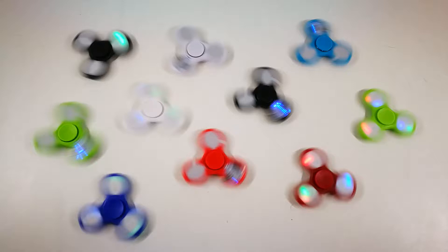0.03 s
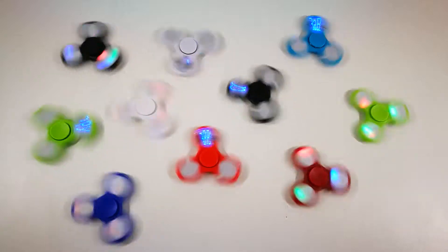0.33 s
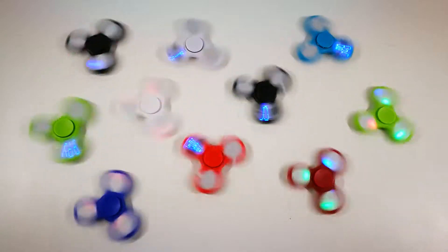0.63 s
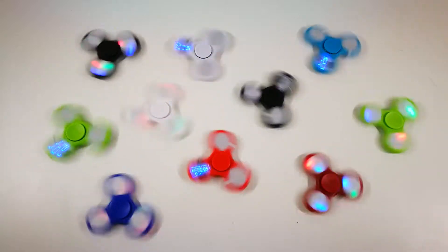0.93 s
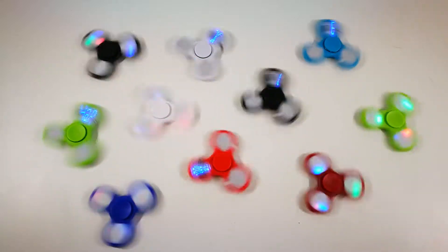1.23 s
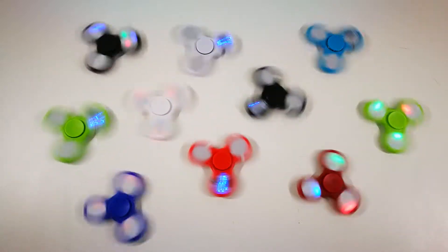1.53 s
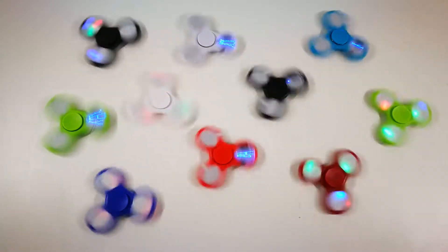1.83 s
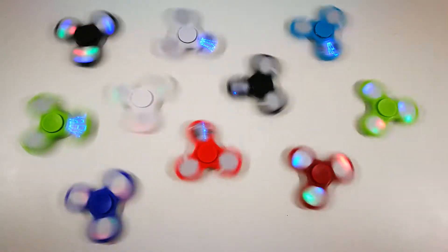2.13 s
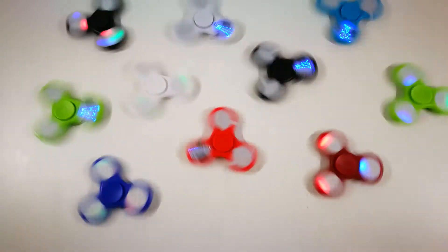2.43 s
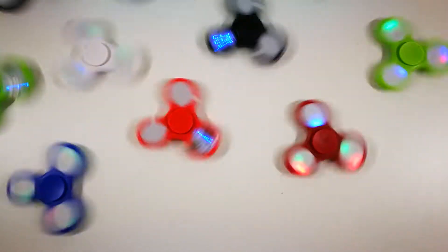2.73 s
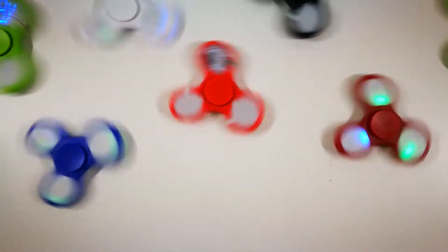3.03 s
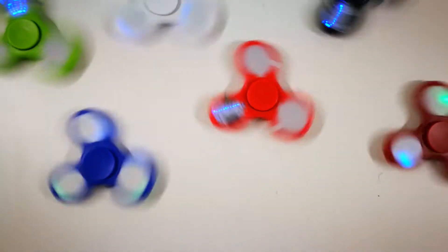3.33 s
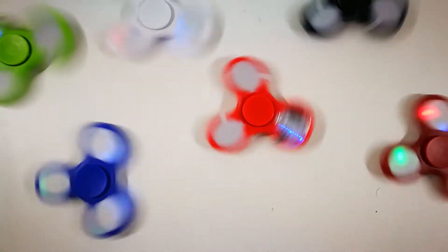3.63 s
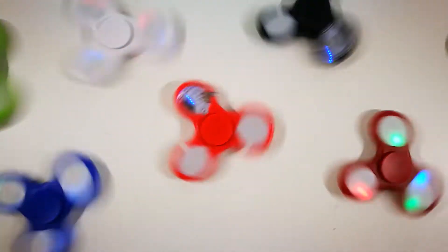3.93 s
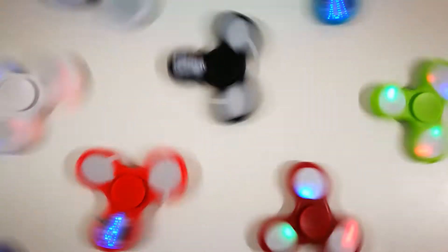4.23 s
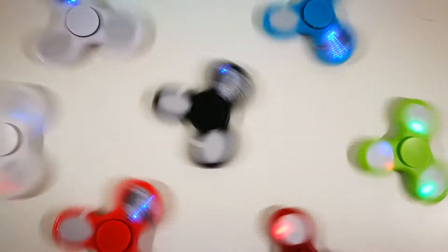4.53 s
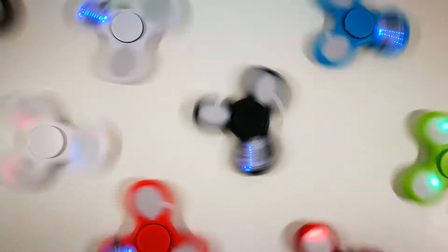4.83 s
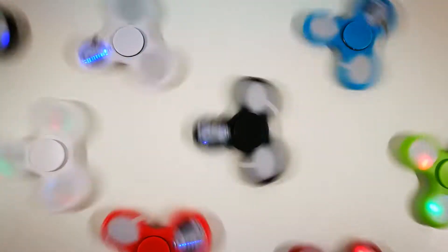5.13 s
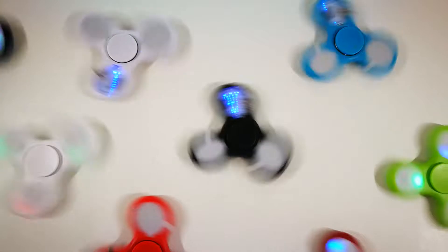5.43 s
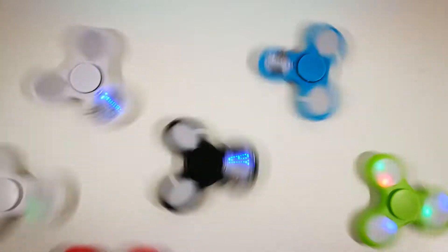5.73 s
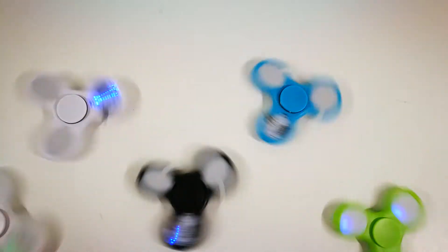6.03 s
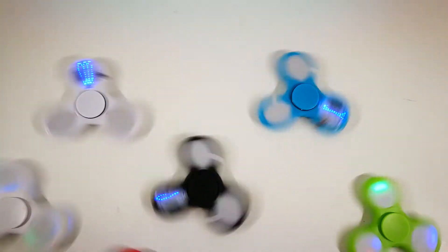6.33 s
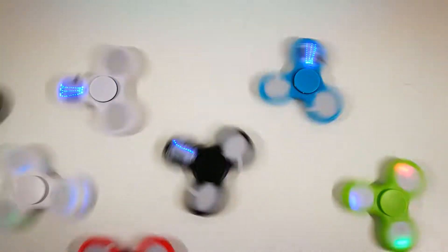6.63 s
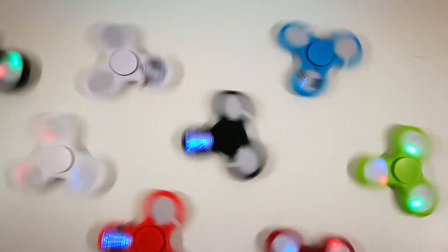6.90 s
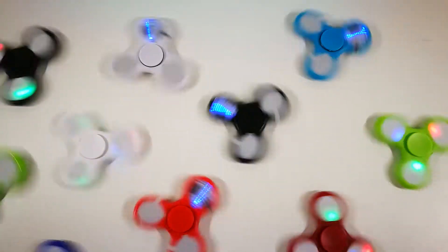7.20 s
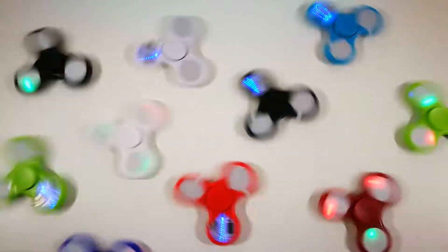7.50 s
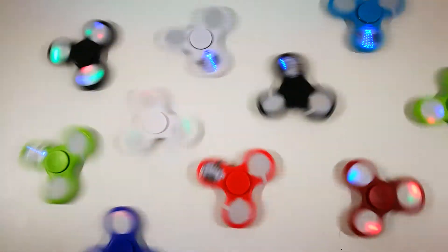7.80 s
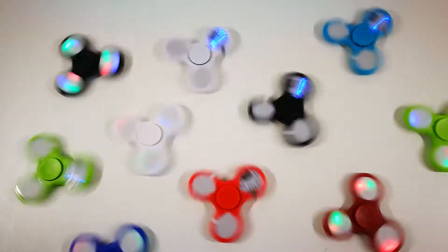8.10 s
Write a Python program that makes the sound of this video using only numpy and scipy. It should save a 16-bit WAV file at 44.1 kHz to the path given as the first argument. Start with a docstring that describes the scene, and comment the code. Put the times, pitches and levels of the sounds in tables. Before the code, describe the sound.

Toy spinners spin on a tabletop indoors, with a continuous hissing rattle of ball bearings over a soft, uneven hum.

```python
"""Fidget spinners on a table

Ten spinners run indoors and slowly wind down while a hand-held microphone moves over them.
Their dry ball bearings tick thousands of times a second, swaying with every turn: the steel hisses,
the plastic bodies ring, the table top drums. A soft low bump comes now and then."""
import sys
import numpy as np
from scipy import signal
from scipy.fft import rfft, irfft, next_fast_len
from scipy.io import wavfile
from scipy.ndimage import uniform_filter1d, map_coordinates

SR = 44100
rng = np.random.default_rng(int(sys.argv[2]) if len(sys.argv) > 2 else 0)


def master(y):
    """Save y as 16-bit WAV."""
    cut = np.clip(np.atleast_2d(y).T, -1, 1)
    pcm = np.round(cut * 32767)  # scale
    wavfile.write(sys.argv[1], SR, pcm.astype(np.int16))


N = 359856
TIME = np.arange(N) / SR
FFT_SIZE = next_fast_len(N + SR // 4, True)
FFT_HZ = np.fft.rfftfreq(FFT_SIZE, 1 / SR)


def amp(db):
    return 10 ** (np.asarray(db) / 20)


def unit(x):
    return x / np.sqrt(np.mean(x ** 2) + 1e-20)


def along(points, hz):
    """Interpolate (Hz, value) points on a log axis."""
    point_hz, values = np.transpose(points)
    return np.interp(np.log(hz + 1), np.log(point_hz + 1), values)


def curves(rows):
    """One curve for each column after the time."""
    times, *columns = np.transpose(rows)
    return [np.interp(TIME, times, column) for column in columns]


def wobble(rate_hz):
    """A smooth random curve."""
    return map_coordinates(rng.standard_normal(int(N * rate_hz / SR) + 4), [TIME * rate_hz])


def swell(peak_s, half_s):
    """A Gaussian rise and fall."""
    out = np.zeros(N)
    near = slice(*np.searchsorted(TIME, [peak_s - 4 * half_s, peak_s + 4 * half_s]))
    out[near] = np.exp(-((TIME[near] - peak_s) / half_s) ** 2)
    return out


def modes(rows, low_hz, high_hz):
    """Band-limited response of resonances with alternating signs."""
    f = FFT_HZ
    response = sum((-1) ** k * amp(db) * 1j * f * width / (hz * hz - f * f + 1j * f * width)
                   for k, (hz, width, db) in enumerate(rows))
    return response / np.sqrt((1 + (low_hz / (f + 1)) ** 8) * (1 + (f / high_hz) ** 8))


def colour(points):
    """Response of a broad spectrum."""
    return amp(along(points, FFT_HZ))


def steadied(x, window_s):
    """A bearing under constant load rings with nearly constant power."""
    power = uniform_filter1d(np.mean(x ** 2, axis=0), int(window_s * SR))
    return unit(x / np.sqrt(np.abs(power) + 0.34))


def shifting(x, depth_db, patch_bins):
    """Paths over the table add and cancel as the microphone moves: patches of colour come and go."""
    spectrum = signal.stft(x, nperseg=1024)[2]
    patches = rng.standard_normal(spectrum.shape[1:])
    for _ in range(2):
        patches = uniform_filter1d(patches, size=patch_bins, axis=0)
        patches = uniform_filter1d(patches, size=50, axis=1)
    return unit(signal.istft(spectrum * amp(depth_db * unit(patches)), nperseg=1024)[1][:, :N])


def held_ring(hz, stray_rad=0.62):
    """An evenly driven resonance: a tone of slightly straying pitch."""
    return np.sin(2 * np.pi * (hz * TIME + rng.random()) + stray_rad * wobble(25))


# Likeness of the two microphone ports. Each row: frequency in Hz, coherence from 0 to 1.
COHERENCE = [(100, .98), (220, .9), (370, .88), (480, .45), (620, .72), (850, .62), (1100, .45), (1600, .6),
             (2000, .6), (3000, .42), (4500, .3), (9000, .15)]
# Phase between the ports. Each row: frequency in Hz, left lead in radians.
LEFT_LEAD = [(90, 0), (215, .6), (300, -.1), (410, -.45), (480, -2.4), (620, -3), (950, -3.1), (1400, -3.1),
             (1650, 0), (1850, .4), (2100, -.8), (2300, .3)]
# Phase scatter from table reflections. Each row: frequency in Hz, spread in radians.
PHASE_SCATTER = [(450, 0), (900, .2), (1200, 1.2), (1800, .5), (2300, .5), (2600, 1.3), (3000, .8),
                 (5000, 2)]
# Port balance. Each row: frequency in Hz, left minus right in dB.
LEFT_EXCESS = [(200, 0.5), (600, 0.5), (2500, 1), (4000, 1.5), (6000, 3), (7200, 3.5), (8500, 7),
               (10000, 6.5), (11300, 9), (13000, -1.5), (15000, 5)]
def stereo(drives, response):
    """Filter two unrelated drives into stereo of rms 1, alike in the bass and apart in the treble."""
    angle = np.arccos(along(COHERENCE, FFT_HZ)) / 2
    mid, side = rfft(drives, FFT_SIZE) * response * [np.cos(angle), np.sin(angle)]
    knots_hz = np.arange(0, SR / 2, 170)
    scatter = np.interp(FFT_HZ, knots_hz, rng.standard_normal(len(knots_hz)))
    phase = along(LEFT_LEAD, FFT_HZ) + along(PHASE_SCATTER, FFT_HZ) * scatter
    lean = amp(along(LEFT_EXCESS, FFT_HZ) / 2) * np.exp(0.5j * phase)
    return unit(irfft([(mid + side) * lean, (mid - side) / lean], FFT_SIZE)[:, :N])


def bearings(spinners, ticks_per_s, sway_db, scatter_db, flutter_db, slowing_per_s=0.035):
    """Ball ticks at two ports; each spinner leans on its bearing once a turn and slows down."""
    ticks = np.zeros((2, N))
    for spin_hz, start_turns in zip(np.linspace(11, 30, spinners), rng.random(spinners)):
        spin_hz *= rng.uniform(0.9, 1.1)
        tick_s = rng.uniform(0, (N - 1) / SR, int(ticks_per_s * N / SR))
        angle = 2 * np.pi * (start_turns + spin_hz * tick_s * (1 - slowing_per_s * tick_s / 2))
        size = amp(sway_db * np.cos(angle) + scatter_db * rng.standard_normal(len(tick_s)))
        for port in ticks:
            port += np.bincount((tick_s * SR).astype(int), size * rng.choice([-1, 1], len(tick_s)), N)
    bunching = wobble(13) + wobble(45)  # loose balls bunch up and spread out
    return ticks * amp(flutter_db * bunching)


def drumming(response):
    """Bearing ticks drive low resonances at a steady level."""
    ticks = bearings(4, ticks_per_s=500, sway_db=3, scatter_db=2, flutter_db=1)
    return steadied(stereo(ticks, response), window_s=0.085)


# Table drumming under the microphone. Each row: time in seconds, level in dB.
TABLE_LEVELS = [(0.3, -55.5), (2.3, -52), (2.6, -55), (3.7, -55.5), (4.7, -50.5), (5.8, -52.5),
                (6.5, -55.5), (7.15, -52.5), (7.45, -58.5), (8.15, -60.5)]
def table_shaking_db(unrest_db=1.5, shudder_offset_db=-6):
    """The table shakes unevenly all the time, and harder in a shudder."""
    base = amp(curves(TABLE_LEVELS)[0] + unrest_db * wobble(9))
    shudder_power = sum((amp(upper_db + shudder_offset_db) * swell(s, SHUDDER_HALF_S)) ** 2
                        for s, _, upper_db in TABLE_SHUDDERS)
    return 10 * np.log10(base ** 2 + shudder_power)


# Table top resonances. Each row: frequency in Hz, width in Hz, gain in dB.
TABLE_MODES = [(91.6, 3.7, -11.5), (151, 5.1, -1), (189.2, 11, -5.5), (225.6, 24, -0.5)]
def table_top(table_db):
    """The spinners shake the table, which drums."""
    return amp(table_db) * drumming(modes(TABLE_MODES, 90, 280))


# Lower and upper cap resonances. Each row: frequency in Hz, width in Hz, gain in dB.
LOWER_CAP_MODES = [(283.7, 12, 0)]
UPPER_CAP_MODES = [(314.7, 17, -3.5), (347.2, 18.5, 2), (389, 23, -8), (424, 18.6, -6), (457, 16, -10)]
# Cap rattle. Each row: time in seconds, lower ring in dB, upper ring in dB.
CAP_LEVELS = [(0.3, -51, -49.5), (1.2, -49, -47.5), (2.2, -48, -48), (2.8, -54.5, -48.5), (4.1, -53, -45),
              (4.3, -62, -46), (4.75, -49, -43), (5.5, -54.5, -47), (6.1, -54.5, -45), (6.6, -57, -47.5),
              (7.3, -52, -46.5), (8.15, -58.5, -49.5)]
def centre_caps(unrest_db=1.86, throb_db=2, throb_hz=8.7):
    """The caps rattle on the table; the nearest spinner's wobble presses its cap down once a turn."""
    lower_db, upper_db = curves(CAP_LEVELS)
    upper_db += throb_db * np.cos(2 * np.pi * throb_hz * TIME + 1.4 * wobble(3))
    lower_db += unrest_db * wobble(20)
    upper_db += unrest_db * wobble(14)
    lower = amp(lower_db) * drumming(modes(LOWER_CAP_MODES, 220, 350))
    upper = amp(upper_db) * drumming(modes(UPPER_CAP_MODES, 280, 560))
    return lower + upper


# Plastic body resonances. Each row: frequency in Hz, width in Hz, gain in dB.
BODY_MODES = [(604.5, 17, -1), (735, 21, -3.5), (804, 25, -3), (872, 42, -5), (1294, 41, -8.5),
              (1440, 35, -2), (1574, 36, -1), (1776, 55, 0.5), (1877, 43, 2), (1980, 47, 1),
              (2132, 50, 2.5), (2263, 100, 1), (2416, 42, 2), (2552, 62, 1)]
# Nearness of the bodies. Each row: time in seconds, level in dB.
BODY_LEVELS = [(0.4, -43), (2, -42.5), (2.7, -44.5), (3.7, -44), (4.1, -43), (4.4, -48.5), (4.9, -45),
               (5.5, -47), (6.9, -47.5), (7.5, -45.5), (8.15, -47)]
# Rolling balls. Each row: frequency in Hz, spectral density in dB.
RUMBLE_SPECTRUM = [(20, -15.5), (50, -13.5), (75, -19.5), (130, -10.5), (300, 2.5), (450, 2.5), (540, 1.5),
                   (760, 2.5), (1000, -1.5), (1400, -0.5), (2200, -14.5), (4000, -15.5)]
def plastic_bodies(table_db, fall_db_per_s=0.18):
    """Rolling balls ring the three-armed bodies; their rumble swells as the table shakes."""
    ring_ticks = bearings(5, ticks_per_s=500, sway_db=-1.5, scatter_db=3, flutter_db=0.5)
    ring = stereo(ring_ticks, modes(BODY_MODES, 410, 2700))
    rumble_ticks = bearings(5, ticks_per_s=600, sway_db=4, scatter_db=1, flutter_db=0.5)
    rumble = stereo(rumble_ticks, colour(RUMBLE_SPECTRUM))
    rumble_db = -45 - fall_db_per_s * TIME + 0.12 * (table_db - table_db.mean())
    ring = amp(curves(BODY_LEVELS)[0]) * shifting(ring, depth_db=0.75, patch_bins=2)
    return ring + amp(rumble_db) * shifting(rumble, depth_db=1.5, patch_bins=2)


def flurries(per_s=110, fade_s=0.005):
    """Balls collide in flurries that start at once and fade: a control of rms 1."""
    hits = np.bincount(rng.integers(0, N, int(per_s * N / SR)), minlength=N)
    level = signal.lfilter([1], [1, -np.exp(-1 / (fade_s * SR))], hits)
    return unit(level - level.mean())


# Steel ticks and their finest fizz. Each row: frequency in Hz, spectral density in dB.
HISS_SPECTRUM = [(1500, -70), (2600, -4.5), (3300, -5), (3700, -5.5), (4000, -4.5), (4350, -2), (5250, -2),
                 (5800, 2), (6080, -2), (6360, 2.4), (6900, -2.5), (7600, -9), (10000, -22)]
FIZZ_SPECTRUM = [(5000, -48), (7200, -3), (8300, -3), (8900, -2), (9700, -4.5), (10400, -9), (11200, -9),
                 (12100, -18), (12950, -22), (13350, -24), (13900, -16.5), (15500, -15)]
# Hiss as the microphone nears and draws back. Each row: time in seconds, level in dB.
HISS_LEVELS = [(0.4, -40.5), (1.8, -40.5), (2.7, -40.5), (3.2, -39.5), (3.9, -40.5), (4.25, -41),
               (4.9, -40.5), (5.5, -40.5), (5.9, -42), (7, -43), (8.15, -43)]
def steel_hiss():
    """Steel on steel: dense sharp ticks, roughened by flurries."""
    hiss_db, = curves(HISS_LEVELS)
    fizz_db = -45 + 0.97 * (hiss_db - hiss_db.mean())
    hiss_ticks = bearings(10, ticks_per_s=1000, sway_db=2.5, scatter_db=2.5, flutter_db=0.3)
    hiss = stereo(hiss_ticks, colour(HISS_SPECTRUM))
    fizz_ticks = bearings(6, ticks_per_s=1400, sway_db=2, scatter_db=1.5, flutter_db=0.53)
    fizz = stereo(fizz_ticks, colour(FIZZ_SPECTRUM))
    hiss = amp(hiss_db) * shifting(hiss, depth_db=0.6, patch_bins=4)
    fizz = amp(fizz_db + 0.18 * wobble(7)) * shifting(fizz, depth_db=0.9, patch_bins=7)
    grit_db = 0.23 * wobble(30) + 0.38 * flurries()
    return amp(grit_db) * (hiss + fizz)


# Ringing parts of single spinners. Each row: frequency in Hz, width in Hz, gain in dB.
RACE_MODES = [(4310, 130, -3.5), (4473, 48, 6.5), (4587, 56, 1.5), (4840, 130, -1)]
ZING_MODES = [(5820, 210, 0), (6350, 230, 1.5)]
DRONE_MODES = [(735, 20, 0)]
RASP_MODES = [(2820, 260, -1.8), (2990, 230, -0.2)]
SIZZLE_MODES = [(8000, 280, -5.5), (8420, 230, -1)]
HOLLOW_MODES = [(1083, 30, 0)]
WHINE_MODES = [(1580, 30, 0)]
BUZZ_MODES = [(477, 77, -5), (501.6, 25, 2.5)]
JANGLE_MODES = [(2066, 74, -1), (2194, 90, -2), (2353, 82, -0.2)]
PING_MODES = [(4590, 35, 0)]
HOOT_MODES = [(880, 28, 0)]
# Passes over spinners. Each row: closest time in seconds, half length in seconds, level in dB, part.
MICROPHONE_PASSES = [(0.5, 1, -45, "race"), (1.7, .5, -52.5, "race"), (2.4, .4, -52, "race"),
                     (3.54, 0.49, -47.5, "race"), (5.2, .45, -51, "race"), (7.1, .6, -53.5, "race"),
                     (1.3, 1.0, -47, "zing"), (3.6, 0.4, -47, "zing"), (4.35, .15, -49, "zing"),
                     (5.1, 0.59, -48.5, "zing"), (6.1, .8, -51.5, "zing"), (1.1, .4, -54.5, "drone"),
                     (3.5, 0.2, -53.5, "drone"), (5.1, .2, -56, "drone"), (.7, 0.68, -56.5, "rasp"),
                     (2.35, .15, -56, "rasp"), (3.7, 0.57, -52.5, "rasp"), (5, 0.25, -51, "rasp"),
                     (7.24, 0.39, -52.5, "rasp"), (0.7, .7, -49, "sizzle"), (2.3, 0.21, -47.5, "sizzle"),
                     (5.04, 0.63, -47.5, "sizzle"), (6.7, .5, -53.5, "sizzle"), (0.73, 0.64, -54, "hollow"),
                     (3.24, 0.36, -52.5, "hollow"), (7.76, 0.2, -56, "hollow"), (3.07, 0.28, -54, "whine"),
                     (3.96, 0.31, -55, "whine"), (4.2, .2, -60, "whine"), (5.25, .25, -53, "whine"),
                     (6.8, 0.95, -55.5, "whine"), (0.66, 0.63, -46, "jangle"), (2.1, 0.41, -49, "jangle"),
                     (3.8, .35, -52, "jangle"), (5.1, .3, -56, "jangle"), (4.36, .13, -49.5, "ping"),
                     (6.5, .5, -59, "ping"), (4.8, .3, -57.5, "hoot"), (6, .5, -57, "hoot"),
                     (2.15, 0.51, -55, "buzz"), (4, 0.4, -59, "buzz"), (6.16, 1, -54, "buzz")]
def single_spinners():
    """Each part rings at its own pitches, louder as the microphone passes over it."""
    parts = dict(race=RACE_MODES, zing=ZING_MODES, drone=DRONE_MODES, rasp=RASP_MODES,
                 sizzle=SIZZLE_MODES, hollow=HOLLOW_MODES, whine=WHINE_MODES, buzz=BUZZ_MODES,
                 jangle=JANGLE_MODES, ping=PING_MODES, hoot=HOOT_MODES)
    out = 0
    for part, rings in parts.items():
        ticks = bearings(3, ticks_per_s=1200, sway_db=4, scatter_db=4, flutter_db=0.83)
        power = sum(amp(db) ** 2 / (1 + ((TIME - s) / half_s) ** 2)
                    for s, half_s, db, name in MICROPHONE_PASSES if name == part)
        out += np.sqrt(power) * stereo(ticks, modes(rings, 0.61 * rings[0][0], 1.4 * rings[-1][0]))
    return out


# Loose bearing resonances. Each row: frequency in Hz, width in Hz, gain in dB.
LOOSE_MODES = [(1718, 16, 0), (1767, 23, -0.5), (2000, 18, -8)]
# Spells of singing. Each row: start in seconds, hold in seconds, level in dB.
SINGING_SPELLS = [(0.35, 1.2, -52.5), (1.503, 0.25, -45.5), (2.3, 0.062, -47.5), (3.128, 0.22, -45),
                  (3.37, 0.18, -42.5), (3.62, .28, -46.5), (4.306, 0.26, -50), (5.574, 0.8, -47.5),
                  (6.25, 0.66, -50), (7.5, 0.14, -53)]
def loose_bearing(attack_s=0.099, release_s=0.12, idle_db=-57.5):
    """A loose bearing chatters into narrow resonances and sings a held note."""
    ticks = bearings(2, ticks_per_s=700, sway_db=1, scatter_db=1, flutter_db=0.5)
    chatter = stereo(ticks, modes(LOOSE_MODES, 1620, 2000))
    warped_s = TIME + 0.00027 * wobble(14)  # pitch wavers as the load shifts
    chatter = np.array([map_coordinates(port, [warped_s * SR]) for port in chatter])
    song = amp(-1.6) * steadied(chatter, window_s=0.05) + amp(-3.5) * held_ring(LOOSE_MODES[0][0])
    spells = [amp(db) * np.interp(TIME - s, [-attack_s, 0, hold_s, hold_s + release_s], [0, 1, 1, 0])
              for s, hold_s, db in SINGING_SPELLS]
    return np.maximum(np.max(spells, axis=0), amp(idle_db)) * song


def rattles(pulses, rings, half_s):
    """Short pulses of ticks into one set of resonances."""
    ticks = bearings(2, ticks_per_s=1200, sway_db=1.5, scatter_db=2, flutter_db=0.5)
    ring = stereo(ticks, modes(rings, 0.95 * rings[0][0], 1.15 * rings[-1][0]))
    return sum(amp(db) * swell(s, half_s) for s, db in pulses) * steadied(ring, half_s)


# Race chatter. Each row: peak time in seconds, level in dB.
RACE_PULSES = [(0.363, -38), (0.465, -44), (0.503, -43), (0.622, -42), (0.775, -44), (0.797, -44),
               (0.895, -39), (1.052, -39), (1.11, -44), (1.68, -42), (3.82, -40), (5.22, -44)]
def race_chatter():
    """A bearing race chatters in short pulses."""
    return rattles(RACE_PULSES, RACE_MODES, half_s=0.0062)


# Ball snaps. Each row: start in seconds, level in dB.
BALL_SNAPS = [(0.405, -34), (0.883, -39), (1.082, -39), (1.397, -29.5), (1.538, -39), (1.648, -38),
              (3.274, -37), (4.135, -33), (4.314, -34), (4.523, -39), (4.602, -38), (4.726, -30),
              (4.967, -35), (5.014, -37), (5.231, -35), (5.493, -38), (6.556, -39)]
# Colour of a snap. Each row: frequency in Hz, spectral density in dB.
SNAP_SPECTRUM = [(2500, -22), (5500, 5), (9000, 4), (11500, -9), (15500, -19)]
def ball_snaps(t60_s=0.021):
    """Single balls snap against their cage: bright ticks that die at once."""
    level, t = np.zeros(N + SR), np.arange(SR // 20) / SR
    for s, db in BALL_SNAPS:
        level[round(s * SR):][:len(t)] += amp(db - 60 * t / t60_s)
    return level[:N] * stereo(rng.standard_normal((2, N)), colour(SNAP_SPECTRUM))


def ringing_out(rows, pitches_hz, half_s):
    """Resonances swell and fade together, each with its own strength."""
    return sum(held_ring(hz) * sum(amp(levels_db[k]) * swell(s, half_s) for s, *levels_db in rows)
               for k, hz in enumerate(pitches_hz))


# Cap bursts. Each row: peak time in seconds, lower ring in dB, upper ring in dB.
CAP_BURSTS = [(0.46, -44, -44), (0.99, -43.5, -44), (1.22, -56, -38), (1.3, -39, -47), (1.59, -39, -59),
              (1.91, -43, -54), (2.12, -40.5, -42), (2.43, -43, -58), (2.9, -60, -42), (3.22, -39, -47),
              (3.58, -60, -40), (3.83, -60, -39), (4.06, -60, -42), (4.15, -60, -37.5), (4.47, -54, -34.5),
              (4.68, -58, -42), (4.79, -61, -42), (4.89, -53, -42), (5.09, -48, -36.5), (5.63, -62, -37),
              (5.9, -60, -38), (7.3, -54, -38), (7.64, -46, -37), (8.03, -50, -41)]
def cap_bursts():
    """A rattling cap rings out for a moment."""
    return ringing_out(CAP_BURSTS, [LOWER_CAP_MODES[0][0], UPPER_CAP_MODES[1][0]], half_s=0.024)


SHUDDER_HALF_S = 0.028
# Table shudders. Each row: peak time in seconds, lower note in dB, upper note in dB.
TABLE_SHUDDERS = [(0.48, -56, -47), (0.84, -54, -43), (1.08, -56, -42), (1.42, -51, -40), (1.8, -54, -40.5),
                  (1.98, -55, -44), (2.14, -47, -46), (2.3, -57, -45.5), (3.44, -47, -56), (4.44, -47, -58),
                  (4.58, -49, -44), (4.73, -44, -47), (5.05, -58, -46), (5.33, -55, -47), (5.85, -48, -47),
                  (6.11, -52.5, -48), (6.95, -47, -54), (7.14, -47, -52), (7.28, -60, -46)]
def table_shudders():
    """The table shudders on two notes when the spinners' wobbles fall into step."""
    return ringing_out(TABLE_SHUDDERS, [TABLE_MODES[1][0], TABLE_MODES[3][0]], SHUDDER_HALF_S)


# Body judders. Each row: peak time in seconds, level in dB.
BODY_JUDDERS = [(1.98, -46), (3.76, -57), (5.0, -45), (6.07, -51)]
# Judder resonances. Each row: frequency in Hz, width in Hz, gain in dB.
JUDDER_MODES = [(533, 68, -8), (635, 34, 5), (765, 50, -3)]
def body_judders():
    """A wobbling body judders against the table."""
    return rattles(BODY_JUDDERS, JUDDER_MODES, half_s=0.035)


# A bearing catches. Each row: peak time in seconds, half length in seconds, level in dB.
BALL_SCRAPES = [(2.656, 0.026, -40), (7.462, .02, -46)]
# Scrape resonances. Each row: frequency in Hz, width in Hz, gain in dB.
SCRAPE_MODES = [(2317, 64, -1), (4500, 120, -7), (4690, 100, -6)]
def ball_scrapes():
    """A ball drags on its race for a moment."""
    drag = sum(amp(db) * swell(s, half_s) for s, half_s, db in BALL_SCRAPES)
    return drag * stereo(rng.standard_normal((2, N)), modes(SCRAPE_MODES, 1900, 5500))


# Soft bumps. Each row: start in seconds, gain in dB.
SOFT_BUMPS = [(3.394, -34.5), (3.437, -47), (4.19, -54), (6.88, -52), (7.0, -57), (7.57, -55), (7.93, -56)]
# Partials of a thud. Each row: frequency in Hz, level in dB, T60 in seconds.
THUD_PARTIALS = [(36, -15, .3), (50, -13, 0.3), (66, -10, .3), (95.6, -3, 0.3), (121, -3, 0.12)]
def bumps(attack_s=0.0082):
    """Soft low thuds that reach both ports alike."""
    out, t = np.zeros(N + SR), np.arange(SR // 2) / SR
    thud = sum(amp(db - 60 * t / t60_s) * np.sin(2 * np.pi * hz * t) for hz, db, t60_s in THUD_PARTIALS)
    thud *= 1 - np.exp(-t / attack_s)
    for s, db in SOFT_BUMPS:
        out[round(s * SR):][:len(t)] += amp(db) * thud
    return out[:N]


# Room decay. Each row: frequency in Hz, T60 in seconds.
ROOM_T60 = [(200, 0.18), (2000, 0.25), (12000, 0.1)]
def room(x, positions=24):
    """A short diffuse tail that changes as the microphone moves from place to place."""
    hz, t, noise = signal.stft(rng.standard_normal((positions, 2, SR // 3)), SR, nperseg=256)
    decay = amp(-60 * t / along(ROOM_T60, hz)[:, None])
    tails = signal.istft(noise * decay, SR, nperseg=256)[1]
    out = np.zeros((2, N + SR))
    for tail, span in zip(tails, np.array_split(np.arange(N), positions)):
        wet = signal.fftconvolve(x[:, span], tail / np.linalg.norm(tail[0]), axes=1)
        out[:, span[0]:span[0] + wet.shape[1]] += wet
    return out[:, :N]


def scene():
    """The whir of the spinners in the room, over the drumming table."""
    table_db = table_shaking_db()
    whir = plastic_bodies(table_db) + steel_hiss() + ball_scrapes() + ball_snaps()
    whir += race_chatter() + body_judders()
    hum = table_shudders() + cap_bursts()
    reverb = amp(-9) * room(whir)
    singing = loose_bearing() + single_spinners()
    return whir + reverb + singing + centre_caps() + table_top(table_db) + hum + bumps()


def record(dry, top_hz=15790):
    """Fade in and cut the highest treble."""
    fade = np.interp(TIME, [0.114, 0.116, 0.4], [0, 0.06, 1])
    return irfft(rfft(dry * fade, FFT_SIZE) * (FFT_HZ < top_hz), FFT_SIZE)[:, :N]


dry = scene()
out = record(dry)
master(out)
```